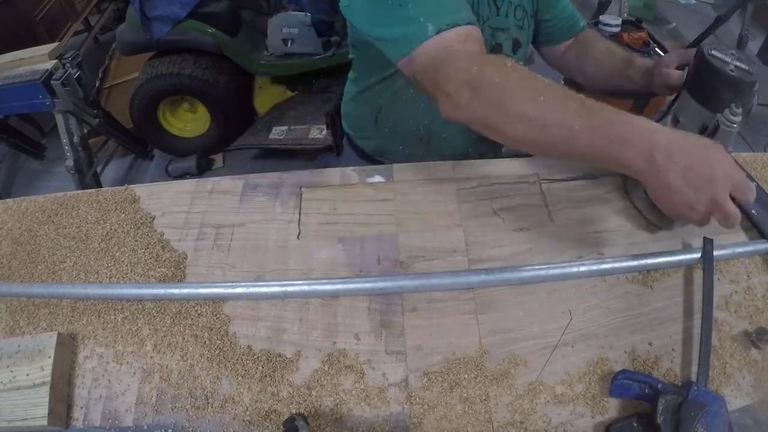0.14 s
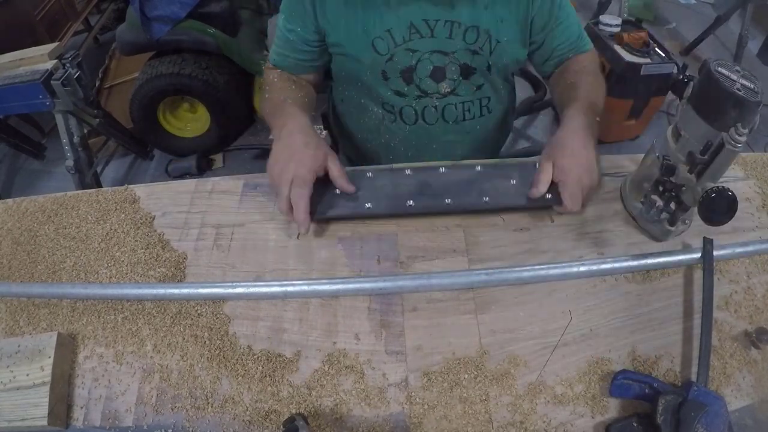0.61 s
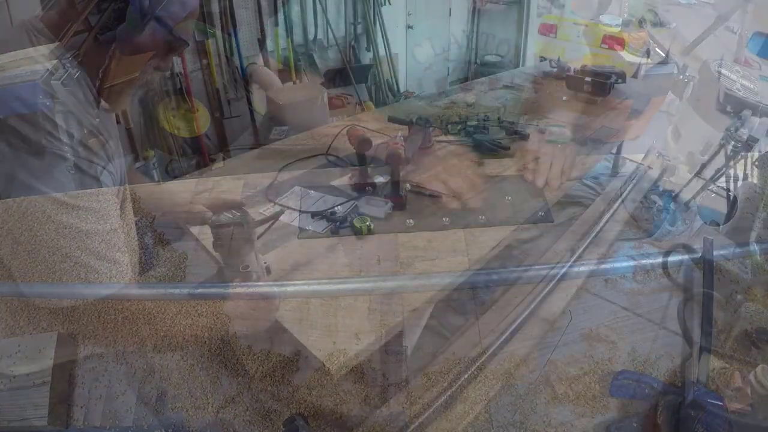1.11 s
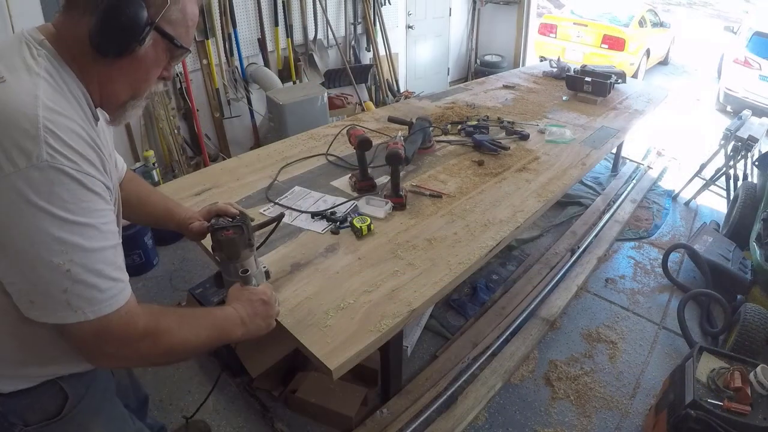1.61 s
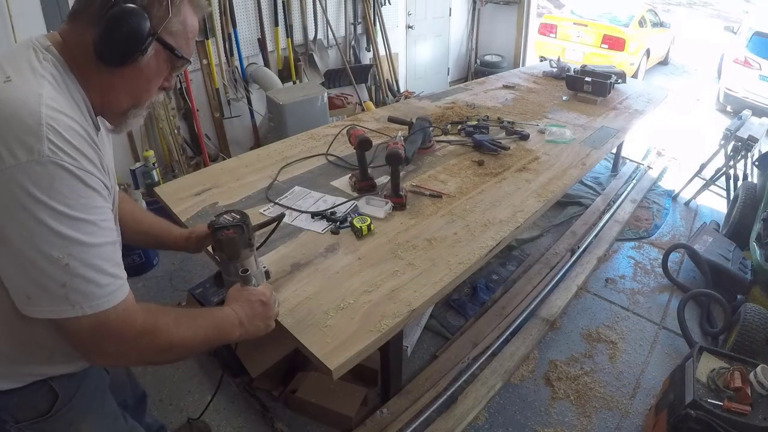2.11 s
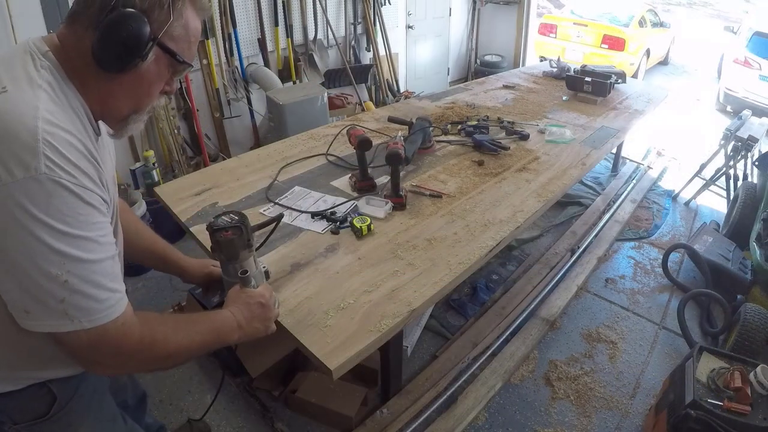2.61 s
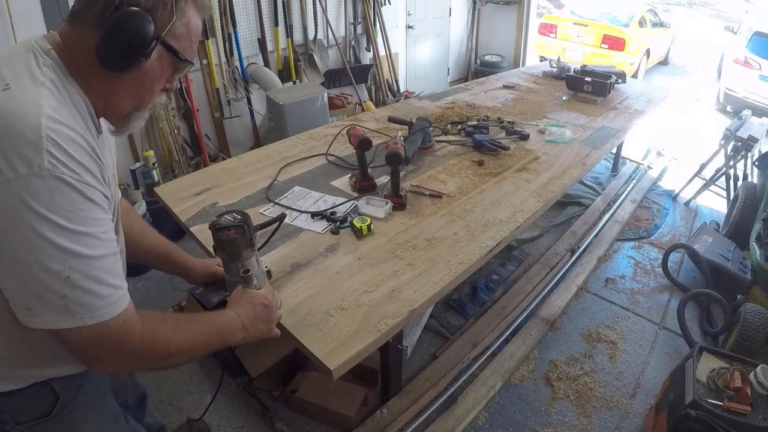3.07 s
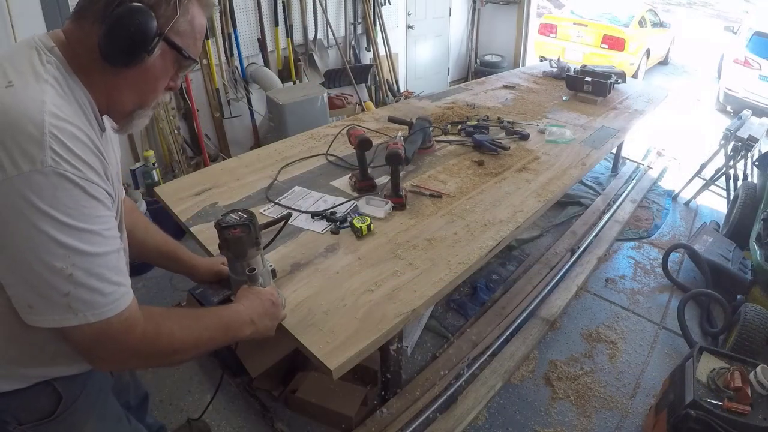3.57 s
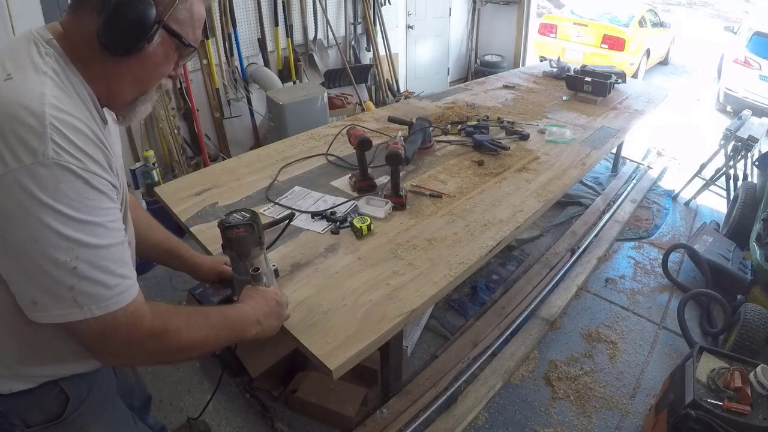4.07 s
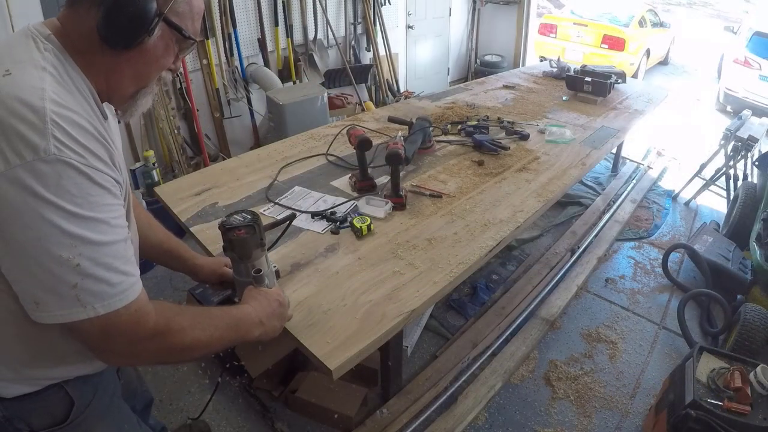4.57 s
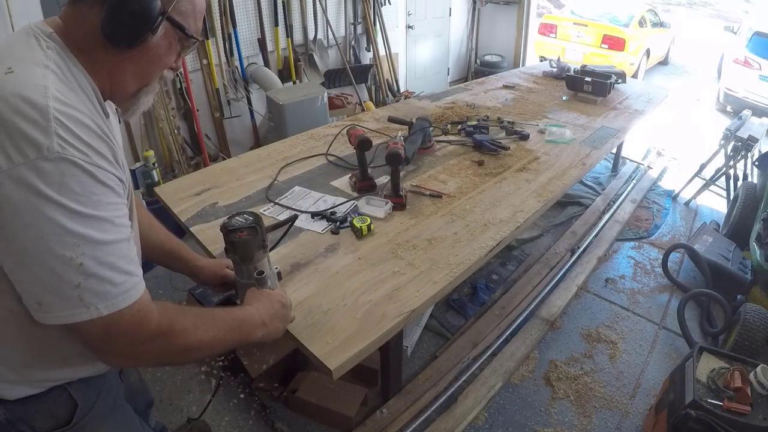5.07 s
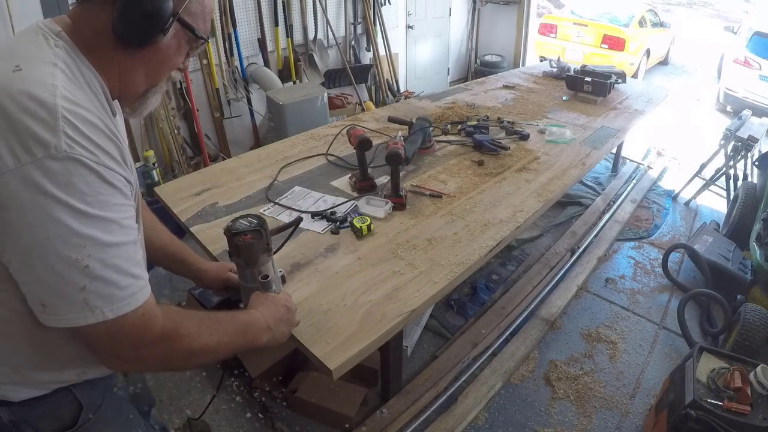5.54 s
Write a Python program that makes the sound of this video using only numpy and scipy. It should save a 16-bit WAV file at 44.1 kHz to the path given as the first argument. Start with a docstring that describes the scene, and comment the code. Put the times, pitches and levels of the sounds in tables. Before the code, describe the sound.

Falling motor whirr with gritty metal sliding and bench thumps, near silence, a sharp click, then a soft-start router spins up and holds a steady roar.

```python
"""A garage shop, with a bench on which a coasting handheld router is set; a steel plate is slid and laid down.
Coloured noise and falling shaft tones make the coasting motor; noise strokes and struck modes make the handling.
After a quiet moment the switch snaps in short modes and noise, and a soft-start motor climbs to full speed:
mains buzz and shaft orders are sums of sines, commutator whine is sine and narrow noise, fan roar is noise."""
import sys
import numpy as np
from scipy import signal
from scipy.io import wavfile
from scipy.ndimage import uniform_filter1d, map_coordinates

SR = 44100
rng = np.random.default_rng(int(sys.argv[2]) if len(sys.argv) > 2 else 0)


def persist_wave(psi):
    """Save psi, clipped to +-1, as 16-bit WAV."""
    counts = np.round(np.clip(psi, -1, 1) * 32767).astype(np.int16)
    wavfile.write(sys.argv[1], SR, np.atleast_2d(counts).T)


def voltage_ratio(level):
    """Linear amplitude factor for a level in decibels (scalar or array-like)."""
    return 10 ** (np.asarray(level, float) / 20)


N = 250488
T = np.arange(N) / SR  # seconds

# Shaft speed while coasting. Each row: time in seconds, speed in turns per second.
COAST_SPEED = [(.09, 345), (.22, 300), (.328, 241.3), (.418, 200.9), (.504, 169.6), (.59, 134), (.682, 106),
               (.76, 92)]
# Shaft orders while coasting. Each row: multiple, level at full speed in dB, slope in dB per octave of speed.
COAST_ORDERS = [(1, -43.5, 0), (2, -56, 0), (3, -54, 9), (4, -54, 12)]
# Bench resonances that a falling order passes through. Each row: frequency in Hz, width in Hz, lift in dB.
BENCH_WAVES = [(113, 16, 8), (147, 14, 4), (184, 12, -15), (207, 11, 5), (245, 14, 2), (290, 32, -10),
               (350, 14, 10), (405, 12, 7), (450, 22, -6), (520, 20, 10)]
# Colour of the coasting roar. Each row: frequency in Hz, relative level in dB.
COAST_COLOUR = [(120, -72.5), (200, -34.5), (373, -15), (645, -10), (720, -3), (1020, -9.5), (1340, -5),
                (1650, -8.5), (2160, -8), (2700, -7.5), (3250, -4.5), (3750, -7), (4400, -3), (4900, -11),
                (5910, -18), (9180, -39), (14500, -27.5), (15900, -44.5)]
# Bench echo that hollows the roar as the router is carried down. Each row: time in seconds,
# first reinforced frequency in Hz, echo share from 0 to 1, ring of the gap under the base as a factor.
HOLLOW = [(0, 990, 0, .1), (.06, 1110, 0, 1.4), (.19, 1420, 0.1, 1.1), (.24, 1100, 0.05, 0.29),
          (.32, 805, 0.34, 0.45), (.5, 760, 0.4, 0.42), (.78, 765, 0, 0.18)]
COAST_DB, COAST_DB_PER_OCTAVE, COAST_END_S = -28.5, 12.5, .77  # level at full speed, slope over speed

# Steel sliding over chips and dust. Each row: start in seconds, end in seconds, level in dB,
# rise in dB per second, fall in dB per second.
SCRAPE = [(0, .704, -36, 1000, 800.5), (.96, 0.99, -37.5, 86.5, 485)]
# Colour of the scrape. Each row: frequency in Hz, relative level in dB.
SCRAPE_COLOUR = [(180, -49), (300, -32.5), (470, -19.5), (644, -39), (760, -19), (1130, -18), (1660, -24.5),
                 (2310, -17.5), (2950, -18), (3250, -8), (4360, -7.5), (5030, 1.5), (5760, -11),
                 (6690, -7.5), (8400, -2.5), (9950, -7), (10800, -14.5), (14100, -18.5), (15900, -24)]
# Bumps through the bench. Each row: time in seconds, level in dB before a final doubling and smoothing,
# share of the higher bench mode from 0 to 1, signed strength, woody knock level in dB.
BUMPS = [(0.229, -16, 0.15, -0.4, -37), (0.252, -12, 0.56, -0.59, -35.5),
         (0.403, -12.5, 0.39, -0.29, -37.5), (0.621, -38.5, 1, -0.78, -61.5),
         (0.663, -32.5, 0.85, -0.74, -59.5), (0.685, -21.5, 0.37, 0.57, -48.5),
         (0.713, -20, 0.6, 0.9, -47.5), (0.804, -19, 0.9, -0.11, -47), (0.957, -36.5, 0.5, -1.5, -62),
         (1.108, -51, 0.85, 0.86, -67)]
# Two low bench modes. Each row: frequency in Hz, 60 dB decay time in seconds.
BENCH_MODES = [(30, 0.22), (85, 0.102)]
# Low shudder of bench and stand. Each row: time in seconds, stand sway in dB, bench rumble in dB.
SHAKE = [(0, -46, -55), (.16, -52, -69), (.34, -51, -47), (.49, -67, -46), (.71, -51, -46),
         (.86, -37.5, -44), (.97, -47, -43.5), (1.09, -44.5, -57), (1.14, -61.5, -85), (2.6, -69, -71.5),
         (3.3, -80, -87), (5.68, -79, -75)]
# Colours of sway, rumble and woody knock. Each row: frequency in Hz, relative level in dB.
SWAY_COLOUR = [(8, 2.5), (28, 10.5), (50, -8.5), (70, -31), (120, -71.5)]
RUMBLE_COLOUR = [(30, -53.5), (55, -19.5), (95, 0.5), (140, -4.5), (220, -29.5), (400, -61.5)]
KNOCK_COLOUR = [(100, -15), (250, 6), (700, 0), (1500, -7.5), (3000, -22), (8000, -44.5)]
KNOCK_T60_S, KNOCK_RISE_S = 0.18, .012
# Hands shifting on the bench top, a dull rub. Each row: start in seconds, end in seconds, level in dB,
# rise in dB per second, fall in dB per second.
RUB = [(.81, 1.03, -64, 600, 202)]
# Chatter of the landing plate. Each row: time in seconds, level in dB of the exciting noise.
PLATE_CLANK = [(0.68, -49), (0.718, -26), (0.745, -38), (0.778, -75), (0.79, -62)]
# Plate modes. Each row: frequency in Hz, width in Hz, relative level in dB.
PLATE_MODES = [(320, 40, -9), (410, 40, -6), (580, 35, -7), (700, 35, -6), (888, 52, -4), (1100, 37, -3),
               (1820, 31, -7), (2310, 35, -5), (2730, 34, -7), (3110, 30, -1), (3450, 38, -1),
               (3970, 60, -6), (4600, 36, -1), (6510, 28, -10), (7350, 28, -14), (9020, 28, -13),
               (9240, 32, -9), (10050, 32, -11)]
PLATE_STOP_S = .765  # a hand presses the plate flat and stops its ring
# Soft noise: last tail of the scrape, then a faint swish, perhaps the router base over wood. Each row:
# time up to which it rises in seconds, time from which it falls in seconds, level in dB,
# rise in dB per second, fall in dB per second (in the first row rise and fall overlap).
SOFT_STROKES = [(1.05, 1.02, -53.5, 900, 380), (1.39, 1.43, -60, 65, 182.5)]
# Colours of the soft noise and of the quiet shop. Each row: frequency in Hz, relative level in dB.
SOFT_COLOUR = [(88, -61), (150, -28), (414, -8), (456, -5), (484, -5.5), (1590, -9.5), (2350, -12.5),
               (4740, -11), (14400, -35.5), (15900, -41)]
QUIET_COLOUR = [(59, -27), (100, -9), (229, 0.5), (321, -11), (512, -12), (799, -14.5), (2620, -20),
                (4740, -20), (7560, -28), (15900, -31.5)]
QUIET_DB = -79

# Contacts of the switch. Each row: time in seconds, level in dB.
SWITCH = [(1.8135, -50), (1.8152, -36), (1.8172, -37), (1.8178, -17.5)]
# Modes of the switch. Each row: frequency in Hz, level in dB added to the contact's, 60 dB decay time in seconds.
SWITCH_MODES = [(995, -17.5, 0.043), (1700, -19.5, 0.011), (2710, -6.5, 0.01), (3230, -4, 0.0049),
                (3750, -2, 0.0059), (4600, -15, 0.006), (9060, -12.5, 0.0049)]
# Colours of the crack and of its echo in the shop. Each row: frequency in Hz, relative level in dB.
CRACK_COLOUR = [(200, -52), (800, -13), (1500, 3), (3000, 6), (5000, -6), (7000, -20), (10000, -15),
                (15000, -23), (17000, -42)]
SNAP_TAIL_COLOUR = [(300, -26.5), (900, -7), (1500, -6.5), (2500, 1), (3500, 0), (4200, -3), (4900, 5),
                    (6000, -9.5), (7500, -15), (9500, -24), (15000, -30), (17000, -43.5)]
CRACK_DB, SNAP_TAIL_DB, SNAP_TAIL_T60_S = -10, -42.5, 0.32  # crack in dB added to the contact's level
# Decay of the shop's echoes. Each row: frequency in Hz, 60 dB decay time in seconds.
SHOP_DECAY = [(300, 0.12), (1000, 0.28), (3000, 0.29), (6000, 0.41), (12000, 0.14)]
SWITCH_ECHO_DB, MOTOR_ECHO_DB = -13, -11  # echo energy against the direct sound

PULSE_HZ = 120.1  # current pulses a second
# Buzz of the windings. Each row: multiple of the pulse rate, level in dB before the swell.
BUZZ = [(2, -72), (3, -63.5), (4, -82), (5, -71.5), (6, -72), (7, -85), (8, -73)]
# Swell of the buzz. Each row: time in seconds, gain in dB.
BUZZ_SWELL = [(1.87, -36), (1.92, 4), (2.38, 8), (2.48, 6), (2.63, 6.5), (2.7, 11), (2.78, 6), (3.4, 8.5),
              (3.8, -1), (5.68, -48)]
# Housing ringing under the current pulses, then commutator whine, then its octave, a broad hiss.
# Each row: start in seconds, end in seconds, level in dB, rise in dB per second, fall in dB per second.
# Rise runs up to the start and fall runs from the end.
RATTLE = [(1.93, 3.2, -61, 400, 300), (2.035, 2.07, -54, 500, 300), (2.17, 2.27, -53, 150, 120)]
WHINE = [(2.19, 2.29, -45, 140, 110), (2.33, 2.4, -52, 100, 90), (2.55, 2.62, -59, 50, 28)]
OVERTONE = [(2.2, 2.3, -67, 150, 100), (2.79, 2.88, -63, 60, 70)]
RATTLE_HZ, COMMUTATOR_BARS = 2010, 23

# Shaft speed while spinning up. Each row: time in seconds, speed in turns per second.
SPIN_SPEED = [(2.0, 52), (2.24, 88), (2.3, 96), (2.41, 122), (2.5, 138.5), (2.75, 181), (2.88, 199.9),
              (3.25, 251.4), (3.62, 302.7), (3.75, 313.4), (3.88, 320.3), (4.12, 331.9), (4.5, 341.8),
              (5.0, 349.5), (5.2, 351.5), (5.68, 352)]
FULL_SPEED = 352  # turns per second
# Low and upper orders of the rising shaft. Each row: multiple, level at full speed in dB,
# slope in dB per octave of speed.
SPIN_ORDERS = [(1, -49, -0.5), (2, -42, 11), (3, -38, 30), (4, -44, 26.5), (5, -42.5, 33), (6, -43, 36),
               (7, -47, 37.5)]
UPPER_ORDERS = [(8, -58, -16), (9, -57, -15), (10, -59, -4), (11, -59.5, -13.5), (12, -65, -2),
                (13, -63.5, -38), (14, -74, -60), (15, -68, -68), (17, -64.5, 0)]
# Standing waves of the shop that low and upper orders pass through. Each row: frequency in Hz,
# width in Hz, lift in dB.
SHOP_WAVES = [(125, 20, -6), (150, 10, -0.5), (170.5, 10, -4), (187, 7, 4), (199, 5, -2), (211, 6, -2.5),
              (223.3, 6.8, -15.5), (238, 7.3, -2), (263.6, 9, 1), (294, 5.3, -6), (299.3, 4.5, 7.5),
              (310.4, 3, -12), (339.3, 2.8, -17), (360, 1.1, 4), (367, 4.6, 3), (427, 35, -2),
              (458, 6.7, 10), (508, 58, -15), (565, 22, -6), (601, 18, -8), (629.5, 14, 11.5),
              (652.5, 13.2, -12), (675, 16.7, 7.5), (760, 39, -9), (910, 47, -1.5), (937, 13.5, -11),
              (959.5, 9, 9.5), (990, 12, -6), (1024, 9.6, 5.5), (1020, 9.1, -8), (1000, 2.8, -4),
              (1052, 2.46, -1), (1056, 1.8, 3.5), (1160, 20, -22), (1280, 77, 7), (1360, 27, -6.5),
              (1404, 2.2, -1.5), (1683, 3.8, -7), (1709, 18, 4.5), (1960, 8.7, 2), (2049, 48, -12),
              (2105, 3.4, 5), (2338, 7.5, 9), (2365, 22, -19), (2432, 25, -7.5)]
UPPER_WAVES = [(2772, 39, -11), (3075, 27, 6), (3250, 27, 7), (3400, 25, -6), (3518, 6.2, -11),
               (3700, 30, 7), (3762, 14, -6), (4210, 6.4, 13), (4224, 1.7, 8.5), (4500, 40, -9),
               (4450, 21, -15), (4730, 24, -1), (5600, 60, 5), (5720, 40, -5), (5820, 16, 10),
               (5865, 25, -2), (5940, 31, 7)]
# Room modes that keep ringing at their own pitch. Each row: frequency in Hz, width in Hz, ring gain in dB.
SHOP_RINGS = [(186, 4, -2), (209, 4, 1), (238, 4, 0), (266, 4, 1), (352, 5, 1), (395, 6, 0), (425, 6, 0),
              (460, 6, -2), (640, 8, -3)]
# Emergence of the upper orders. Each row: time in seconds, gain in dB.
UPPER_SWELL = [(3.62, -18), (3.8, -3), (3.92, 5.5), (5.68, 8)]
# Across the shop the small motor loses this much for each octave below the corner.
BASS_CUT_HZ, BASS_CUT_DB = 199, 40.5

# Colours of the fan roar at slow and at full speed. Each row: frequency in Hz, relative level in dB.
ROAR_SLOW = [(35, -56), (60, -45), (146, -17.5), (193, -19), (354, -4.5), (747, -2.5), (988, -3.5),
             (2820, -12), (3400, -9.5), (5960, -23.5), (13200, -28.5), (14800, -37), (15900, -63.5)]
ROAR_FAST = [(35, -68), (60, -33.5), (293, -26), (346, -17.5), (634, -11.5), (696, -12), (764, -4.5),
             (1040, -1), (1140, -6), (1770, -11.5), (2240, -14.5), (4830, -15), (7190, -26.5),
             (12300, -31.5), (15900, -40.5)]
# Resonances of the motor housing. Each row: frequency in Hz, width in Hz, lift in dB
# (above 2000 Hz the lift is scaled with speed).
HOUSING = [(484, 42, 4), (572, 28, 6), (1040, 69, 2), (1307, 78, 5.5), (3270, 170, 3), (4180, 300, 4),
           (4580, 540, 3), (6880, 310, 2), (8580, 900, 4)]
ROAR_ON_S, ROAR_RISE, ROAR_DB, ROAR_DB_PER_OCTAVE = 2.006, 69, -37, 12  # rise in dB per second
ROAR_SPEEDS = (82, 292)  # turns per second between which the roar grows
BRIGHT_SPEEDS, BRIGHT_SHARE = (112, 309), 0.98  # where the full-speed colour takes over; its final power share
LIFT_SPEEDS, LIFT = (216, 260), (0.78, 1.385)  # factor on the dB lift of the upper housing resonances


def evened(x):
    """Normalization: scales a signal to rms 1."""
    return x / np.sqrt(np.mean(x ** 2) + 1e-20)


def read(points, hz):
    """Interpolation of a curve along a logarithmic frequency axis."""
    f, value = np.transpose(points)
    return np.interp(np.log(hz + 1), np.log(f + 1), value)


def played(rows):
    """Interpolation of columns over time, with a gate that opens and shuts softly at the table's ends."""
    s, *columns = np.transpose(rows)
    opening = T - s[0] + (s[0] <= 0)  # open from the outset if the table starts at 0
    closing = s[-1] - T + (s[-1] > 5.6)  # open to the last if the table reaches the end
    gate = np.clip(np.minimum(opening, closing) / .015, 0, 1)
    return gate, *(np.interp(T, s, c) for c in columns)


def between(start, end):
    """Gating: linear ramps of 15 ms open and shut the sound."""
    return np.clip(np.minimum(T - start, end - T) / .015, 0, 1)


def swells(rows):
    """Exponential envelopes: strokes rise up to the start and fall from the end at steady dB rates."""
    return sum(voltage_ratio(db - rise * np.maximum(start - T, 0) - fall * np.maximum(T - end, 0))
               for start, end, db, rise, fall in rows)


def drift(rate):
    """Random modulation: rate points per second joined by lines, at rms 1."""
    points = np.arange(6 * rate + 2)
    return evened(np.interp(T * rate, points, rng.standard_normal(len(points))))


def noise(colour, patchy_db, size=1024):
    """Noise synthesis from random short-time spectra of a given colour with drifting patches."""
    hz = np.fft.rfftfreq(size, 1 / SR)
    real, imaginary, patches = rng.standard_normal((4 * N // size + 5, len(hz), 3)).T
    patches = uniform_filter1d(patches, size=10, axis=0)
    patches = evened(uniform_filter1d(patches, size=8, axis=1))
    spectra = (real + 1j * imaginary) * voltage_ratio(read(colour, hz)[:, None] + patchy_db * patches)
    return evened(signal.istft(spectra, nperseg=size, noverlap=3 * size // 4)[1][:N])


def rush(gain, colour, patchy_db, grain_db):
    """Friction and flow noise: coloured noise under a gain curve, roughened by fast grains."""
    return gain * evened(noise(colour, patchy_db, size=512) * voltage_ratio(grain_db * drift(rate=540)))


def resonate(x, hz, width):
    """Resonance by heterodyning: shifts the frequency hz down to zero, smooths, and shifts back."""
    turn = np.exp(2j * np.pi * np.cumsum(hz * np.ones(len(x))) / SR)
    r = np.exp(-np.pi * width / SR)
    return 2 * (turn * signal.lfilter([1 - r], [1, -r], x * turn.conj())).real


def ring(s, hz, t60):
    """Free decay of a mode struck at time s."""
    out, part = np.zeros(N), slice(int(s * SR) + 1, int((s + 2 * t60) * SR))
    t = T[part] - s
    out[part] = voltage_ratio(-60 * t / t60) * np.sin(2 * np.pi * hz * t)
    return out


def tone(angle, waver_db):
    """Harmonic oscillation: a sine of rms 1 before its strength is made to waver."""
    return np.sqrt(2) * np.sin(angle + 2 * np.pi * rng.random()) * voltage_ratio(waver_db * drift(rate=25))


def turning(speed):
    """Rotation: shaft angle, size of the speed change (turns per s each s), and speed (turns per s)."""
    turns = uniform_filter1d(np.interp(T, *np.transpose(speed)), size=3000)
    return 2 * np.pi * np.cumsum(turns) / SR, abs(np.gradient(turns)) * SR, turns


def shaft(orders, speed, waves, waver_db, cut_hz):
    """Order excitation: shaft multiples follow speed and swell or fade as they cross resonances."""
    angle, sweep, turns = turning(speed)
    depth_db = waver_db * (1 + np.minimum(sweep / 60, 2))  # a sweeping tone breaks up among echoes
    turns, out = turns[::64], 0  # gains are worked out every 64 samples
    for k, db, slope in orders:
        hz = k * turns
        waves_db = sum(lift_db * np.exp(-((hz - f) / width) ** 2) for f, width, lift_db in waves)
        db = db + slope * np.log2(turns / FULL_SPEED)
        db = db + BASS_CUT_DB * np.minimum(np.log2(hz / cut_hz), 0)
        gain = np.repeat(voltage_ratio(db + uniform_filter1d(waves_db, size=20)), repeats=64)[:N]
        out = out + gain * tone(k * angle, depth_db)
    return out


def shop(x, wet_db):
    """Reverberation: sparse echoes of random sign die away band by band."""
    taps = np.zeros(SR // 2)
    at = np.arange(200, SR // 2 - 20, 20)
    taps[at + rng.integers(0, 20, len(at))] = rng.choice([-1., 1.], len(at))
    hz, t, z = signal.stft(taps, SR, nperseg=256)
    tail = signal.istft(z * voltage_ratio(-60 * t / read(SHOP_DECAY, hz)[:, None]), SR, nperseg=256)[1]
    return x + voltage_ratio(wet_db) * signal.fftconvolve(x, tail / np.linalg.norm(tail))[:N]


def coasting_fan():
    """Comb filtering: the sinking roar rings in the gap under the base and meets its inverted bench echo."""
    *_, turns = turning(COAST_SPEED)
    gain = voltage_ratio(COAST_DB + COAST_DB_PER_OCTAVE * np.log2(turns / FULL_SPEED))
    roar = rush(gain * between(0, COAST_END_S), COAST_COLOUR, patchy_db=-2.0, grain_db=0.5)
    _, hz, share, gap_ring = played(HOLLOW)
    roar = roar + gap_ring * resonate(roar, hz, width=300)
    echo = map_coordinates(roar, [(T - 1 / (2 * hz)) * SR], order=3)  # half a period late
    return roar - share * echo


def scrape():
    """Sliding friction: steel over chips and dust gives grainy coloured noise."""
    return rush(swells(SCRAPE), SCRAPE_COLOUR, patchy_db=-2.0, grain_db=1.0)


def quiet_shop():
    """Background noise: a faint, steady, patchy spectrum."""
    return voltage_ratio(QUIET_DB) * noise(QUIET_COLOUR, patchy_db=5.5)


def bench():
    """Modal excitation: bumps ring two low modes, with woody knocks and a rub, over a lumpy shudder."""
    (low_hz, low_t60), (high_hz, high_t60) = BENCH_MODES
    bumps = sum(voltage_ratio(db) * way * ((1 - high) * ring(s, low_hz, low_t60) + high * ring(s, high_hz, high_t60))
                for s, db, high, way, _ in BUMPS)
    knocks = sum(voltage_ratio(db - 60 * np.maximum(T - s, 0) / KNOCK_T60_S) * np.clip((T - s) / KNOCK_RISE_S, 0, 1)
                 for s, *_, db in BUMPS)
    wood = (knocks + swells(RUB)) * noise(KNOCK_COLOUR, patchy_db=5.5)
    _, sway_db, rumble_db = played(SHAKE)
    sway = voltage_ratio(sway_db) * noise(SWAY_COLOUR, patchy_db=0.6, size=4096)
    rumble = voltage_ratio(rumble_db) * noise(RUMBLE_COLOUR, patchy_db=9.0, size=2048)
    return 2 * uniform_filter1d(bumps, size=130) + wood + sway + rumble


def coasting_shaft():
    """Order excitation: the slowing shaft's multiples fall through the resonances of the bench."""
    return between(.27, .74) * shaft(COAST_ORDERS, COAST_SPEED, BENCH_WAVES, waver_db=1.1, cut_hz=66)


def plate():
    """Forced modal vibration: the landing plate chatters, rings in its modes and is damped by a hand."""
    gate, db = played(PLATE_CLANK)
    chatter = (gate * voltage_ratio(db) * rng.standard_normal(N))[:SR]  # all is over within the first second
    modes = sum(voltage_ratio(db) / np.sqrt(width) * resonate(chatter, hz, width) for hz, width, db in PLATE_MODES)
    modes = modes * voltage_ratio(-60 * np.maximum(T[:SR] - PLATE_STOP_S, 0) / 0.025)
    modes = modes * np.std(chatter) / np.std(modes) * voltage_ratio(-1.5)
    thud = voltage_ratio(-6.5) * resonate(chatter, hz=870, width=1600)
    return np.pad(modes + thud, (0, N - SR))


def soft_noise():
    """Friction noise: the last tail of the scrape, then a faint swish, both softly coloured."""
    return rush(swells(SOFT_STROKES), SOFT_COLOUR, patchy_db=2.0, grain_db=0.1)


def switch():
    """Impact: a plastic snap excites short modes and a crack of noise."""
    modes = sum((-1) ** k * voltage_ratio(db + mode_db) * ring(s, hz, t60)
                for s, db in SWITCH for k, (hz, mode_db, t60) in enumerate(SWITCH_MODES))
    burst = sum(voltage_ratio(db + CRACK_DB - 60 * np.maximum(T - s, 0) / 0.011) * (T > s) for s, db in SWITCH)
    snap = modes + burst * noise(CRACK_COLOUR, patchy_db=-0.5, size=256)
    band = signal.butter(2, (650, 13000), 'band', fs=SR, output='sos')
    return signal.sosfilt(band, snap)  # the snap carries no bass


def snap_echo():
    """Diffuse reverberation: coloured noise decays exponentially after the last contact."""
    after = T - SWITCH[-1][0]
    decay = (after > 0) * voltage_ratio(SNAP_TAIL_DB - 60 * abs(after) / SNAP_TAIL_T60_S)
    return decay * noise(SNAP_TAIL_COLOUR, patchy_db=2.0, size=256)


def current_pulses(sharp):
    """Phase control: current passes in short pulses, twice a mains cycle."""
    return evened(np.exp(sharp * np.cos(2 * np.pi * PULSE_HZ * T)))


def fan():
    """Flow noise: the roar grows and brightens with speed, throbs with the current and excites the housing."""
    *_, turns = turning(SPIN_SPEED)
    db = ROAR_DB + ROAR_DB_PER_OCTAVE * np.log2(np.clip(turns, *ROAR_SPEEDS) / ROAR_SPEEDS[1])
    db = db - ROAR_RISE * np.maximum(ROAR_ON_S - T, 0)
    fast = np.interp(turns, BRIGHT_SPEEDS, (0, BRIGHT_SHARE))
    lift = np.interp(turns, LIFT_SPEEDS, LIFT)
    air = np.sqrt(1 - fast) * noise(ROAR_SLOW, patchy_db=1.8)
    air = air + np.sqrt(fast) * noise(ROAR_FAST, patchy_db=0.96)
    air = air + sum((voltage_ratio(lift_db * (lift if hz > 2000 else 1)) - 1) * resonate(air, hz, width)
                    for hz, width, lift_db in HOUSING)
    started = T > SWITCH[-1][0]
    return started * voltage_ratio(db + 0.12 * drift(rate=7.2)) * air * current_pulses(sharp=0.053)


def windings():
    """Magnetic forces: current pulses make the windings buzz on the mains multiples."""
    gate, swell_db = played(BUZZ_SWELL)
    buzz = sum(voltage_ratio(db) * tone(2 * np.pi * k * PULSE_HZ * T, waver_db=.8) for k, db in BUZZ)
    return gate * voltage_ratio(swell_db) * buzz


def narrow_noise(x, hz, width):
    """Cascaded resonance: two equal passes narrow a noise, which is then set to rms 1."""
    return evened(resonate(resonate(x, hz, width), hz, width))


def rattle():
    """Forced resonance: the current pulses rattle the housing."""
    knocks = rng.standard_normal(N) * current_pulses(sharp=0.56) + .3 * current_pulses(sharp=300)
    return swells(RATTLE) * narrow_noise(knocks, RATTLE_HZ, width=380)


def low_orders():
    """Modal excitation: low shaft multiples step from one room mode to the next as they climb."""
    orders = shaft(SPIN_ORDERS, SPIN_SPEED, SHOP_WAVES, waver_db=.9, cut_hz=BASS_CUT_HZ)
    early = orders[:4 * SR] * between(0, 3.7)[:4 * SR]  # only while the speed sweeps fast
    rings = sum(voltage_ratio(db) * resonate(early, hz, width) for hz, width, db in SHOP_RINGS)
    return orders + np.pad(rings, (0, N - 4 * SR))


def commutator():
    """Bar-passing excitation: brushes over the bars whistle, chopped by the current pulses."""
    angle, _, turns = turning(SPIN_SPEED)
    bars_hz = COMMUTATOR_BARS * turns
    rough = narrow_noise(rng.standard_normal(N), bars_hz, width=290)
    pure = np.sqrt(2) * np.sin(COMMUTATOR_BARS * angle)
    whine = swells(WHINE) * evened((.72 * pure + .48 * rough) * current_pulses(sharp=1.0))
    octave = narrow_noise(rng.standard_normal(N), 2 * bars_hz, width=900)
    return whine + swells(OVERTONE) * octave


def upper_orders():
    """Order excitation: higher shaft multiples come out of the roar near full speed."""
    gate, swell_db = played(UPPER_SWELL)
    orders = shaft(UPPER_ORDERS, SPIN_SPEED, UPPER_WAVES, waver_db=1.7, cut_hz=BASS_CUT_HZ)
    return gate * voltage_ratio(swell_db) * orders


def scene():
    """Superposition: the coasting router and bench work, then the quiet shop and the spin-up."""
    coasting = coasting_fan() + coasting_shaft()
    handling = scrape() + bench() + plate() + soft_noise()
    snap = shop(switch(), SWITCH_ECHO_DB) + snap_echo()
    motor = shop(fan() + rattle() + commutator(), MOTOR_ECHO_DB)
    running = windings() + motor + low_orders() + upper_orders()
    return (coasting + handling + quiet_shop() + snap + running)[None]


def top_cut(x):
    """Nothing passes above the cut-off."""
    return signal.sosfilt(signal.butter(12, 16040, fs=SR, output="sos"), x)


def record(dry):
    """Transmission: hands on the finished mix."""
    return top_cut(dry)


dry = scene()
out = record(dry)
persist_wave(out)
```